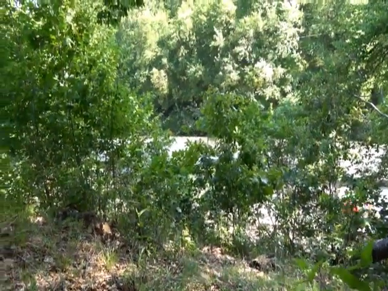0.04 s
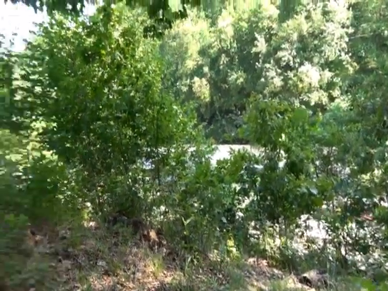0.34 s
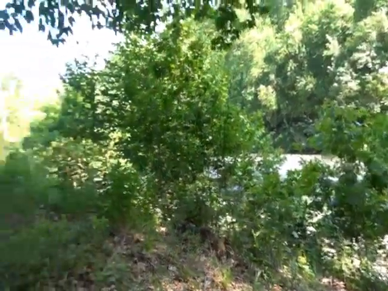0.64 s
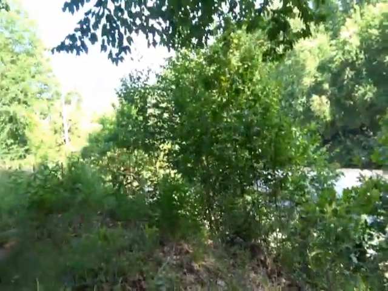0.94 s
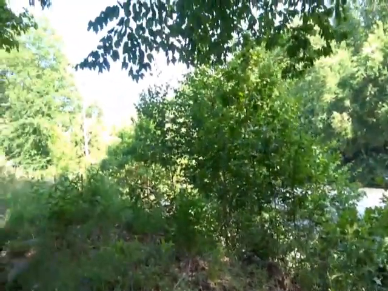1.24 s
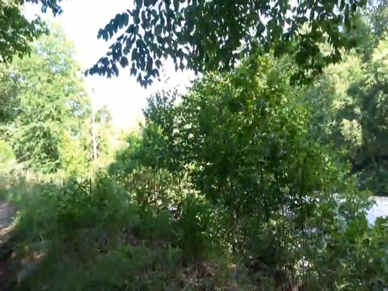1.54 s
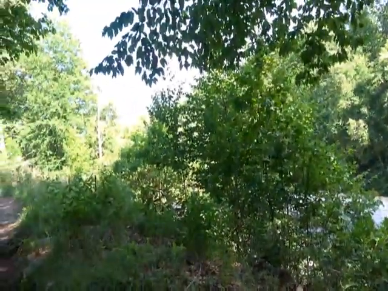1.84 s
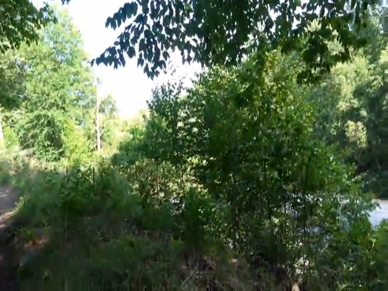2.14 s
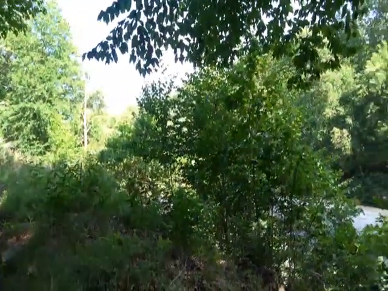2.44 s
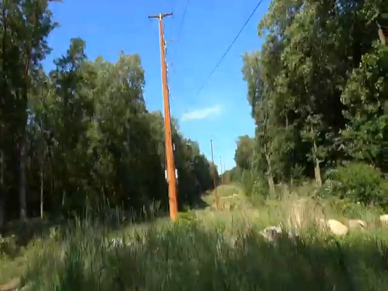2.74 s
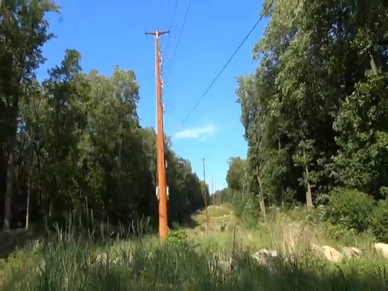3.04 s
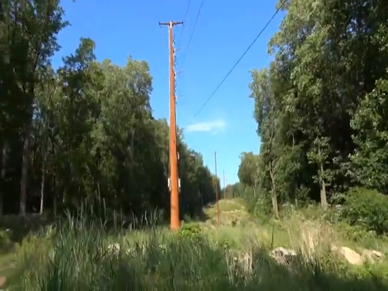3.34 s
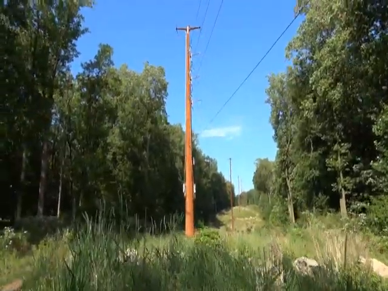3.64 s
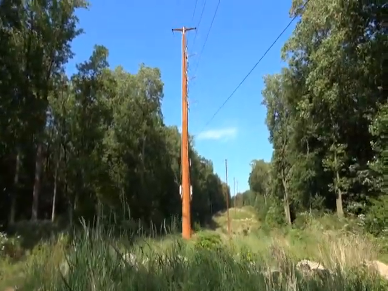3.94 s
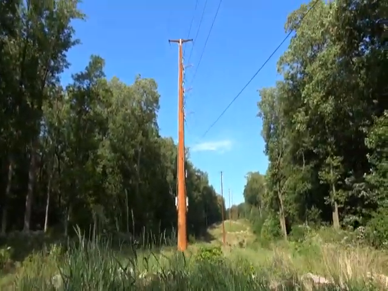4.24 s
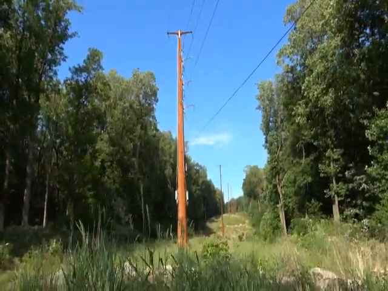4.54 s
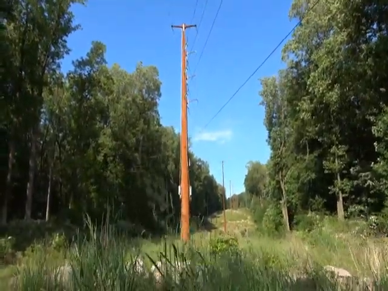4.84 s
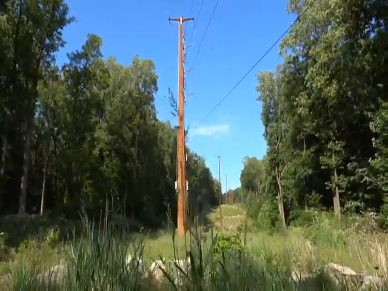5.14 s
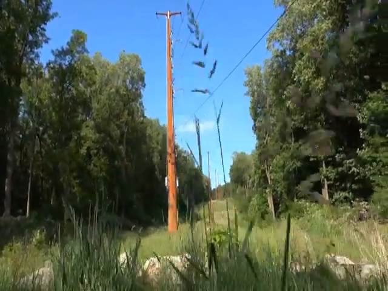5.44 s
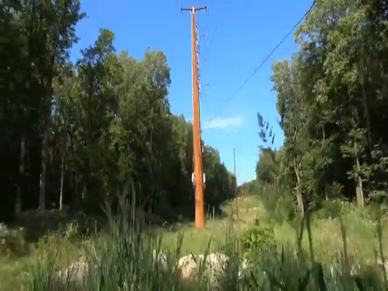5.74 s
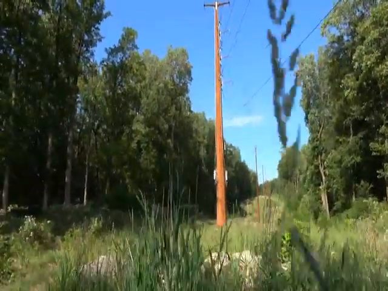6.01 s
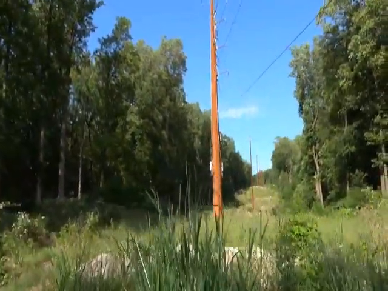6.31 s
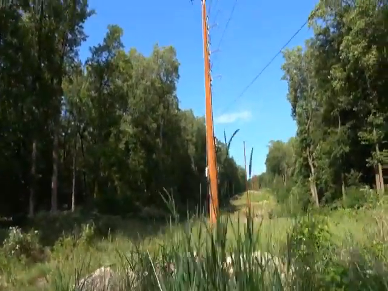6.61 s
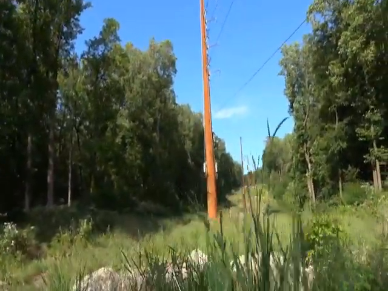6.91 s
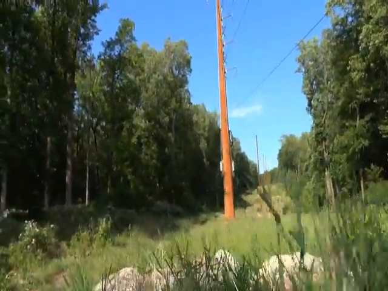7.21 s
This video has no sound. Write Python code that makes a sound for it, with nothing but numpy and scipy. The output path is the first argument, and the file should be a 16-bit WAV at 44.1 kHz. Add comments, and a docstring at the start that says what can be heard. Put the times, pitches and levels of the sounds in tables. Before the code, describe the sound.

From the start, a steady, broad roar of tyres from a busy road comes through the trees, wavering slightly in the moving air. A car's exhaust hum passes at about 0.5 seconds, dipping a little in pitch as it fades, while the hiss of river rapids gradually rises underneath. A dry twig gives one tiny, sharp tick at about 2.2 seconds. At about 2.5 seconds the sound stutters for an instant with a few clicks and jumps to a woodland clearing further from the road. The roar is now softer and duller, with a low rumble. One distant truck drones past around 4 seconds, and a second, deeper one swells slowly to its peak near 6.5 seconds. A faint hiss of leaves dies away with the breeze, and the far traffic continues until the end at about 7.5 seconds.

```python
"""Tyre roar from a busy road, heard through trees at two places in a wood; moving air makes it waver.
River bank: a car's exhaust note, rising hiss of rapids, a twig ticking underfoot.
The sound freezes briefly, clicks at the seams and jumps to a power-line clearing further from the road.
Clearing: two trucks drone under a softer roar; a dying breeze stirs the leaves."""
import sys
import numpy as np
from scipy import signal
from scipy.fft import rfft, irfft, next_fast_len
from scipy.io import wavfile
from scipy.ndimage import map_coordinates

SR = 44100
rng = np.random.default_rng(int(sys.argv[2]) if len(sys.argv) > 2 else 0)


def wav_out(sig):
    """Save sig, one row per channel (or a flat mono array), as 16-bit PCM at SR to the path in sys.argv[1]."""
    wavfile.write(sys.argv[1], SR, np.round(np.clip(np.atleast_2d(sig).T, -1, 1) * 32767).astype(np.int16))


N = 325017
TIME_S = np.arange(N) / SR

# Road spectra; soft ground absorbs 300-550 Hz: f/Hz, base density/(dB re 1/Hz), pan L-R/dB
BANK_ROAD_SPECTRUM = [(25,-62,3), (45,-56,3), (75,-47,2), (130,-49,-0.5), (250,-50,-6.5), (395,-57,-9),
                      (578,-55,-9), (836,-42.5,-5.5), (1094,-44,-6), (1441,-49.0,-7), (1907,-53,-5),
                      (3075,-66,-4.5), (5460,-78.5,-4.5), (11000,-98,-2.4)]
CLEARING_ROAD_SPECTRUM = [(25,-54,0), (60,-46.5,4.5), (100,-44.5,3.5), (144,-48,-1), (201,-53.5,-11.5),
                          (294,-60,-7), (542,-57.5,-3.5), (730,-53.5,-5.5), (1040,-53,-8), (1907,-62,-7.5),
                          (3110,-74,-6), (4290,-79.5,-4.5), (5980,-86,-3.5), (10500,-102.7,0.1)]
# Diffuse hiss spectra: f/Hz, base density/(dB re 1/Hz)
RAPIDS_SPECTRUM = [(30, -75), (180, -62.5), (450, -80), (900, -63), (2000, -77), (4300, -85), (6200, -84),
                   (11000, -99)]
LEAF_SPECTRUM = [(30, -77), (180, -66.5), (450, -74.5), (900, -70), (2000, -85), (4300, -90.5),
                 (6200, -87.5), (11000, -100)]
# Exhaust tones: nearest t/s, time to -3 dB/s, firing f/Hz, glide/(Hz/s), wander/Hz,
# level/dB, relative octave level/dB, pan L-R/dB
ENGINE_PASSES = [(.45, 0.7, 227, -7.5, 1.07, -35, -15, -6), (3.95, 1.2, 102.3, -1.5, 2.2, -30.5, -9.5, 2),
                 (6.5, 3, 63.23, .5, 1.186, -33.5, -8.5, 3)]
# Fibre breaks in a dry twig: t/s, level/dB, f/Hz, t60/s
TWIG_BREAKS = [(2.2142, -23, 7000, 0.0046), (2.2145, -31, 10500, .003), (2.2153, -21, 4600, .004),
               (2.2163, -31, 8600, .006)]

FREEZE_S, BLOCK_S = 2.4946, 1 / 30
MIC_CUTOFF_HZ, OUTPUT_CUTOFF_HZ = 10800, 14400


def road(spectrum, tyre_db, tread_db, rumble_db, waver_db):
    """Tyres and engines merge into one roar; moving air makes each band waver."""
    roar = np.zeros((2, N))
    for hz, band in noise_bands(spectrum):
        engine_share = 1 / (1 + (hz / 150) ** 4)
        tread_share = 1 / (1 + (1150 / hz) ** 6) / (1 + (hz / 2700) ** 4)
        gain_db = engine_share * rumble_db + (1 - engine_share) * tyre_db + tread_share * tread_db
        _, pan_db = spectrum_at(spectrum, hz)
        roar += band * undb(gain_db + waver_db * drift(rate_hz=5)) * pan(pan_db)
    return roar


def engine(nearest_s, passing_s, firing_hz, glide_hz_per_s, wander_hz, level_db, octave_db, pan_db):
    """Far exhaust passing by: only the firing tone and its octave carry, falling as 1/distance."""
    since_s = TIME_S - nearest_s
    relative_distance = np.hypot(1, since_s / passing_s)
    pitch_hz = firing_hz + glide_hz_per_s * since_s + wander_hz * drift(rate_hz=8)
    phase = 2 * np.pi * np.cumsum(pitch_hz) / SR
    tone = np.sin(phase) + undb(octave_db) * np.sin(2 * phase)
    air_fading_db = 2.6 * drift(rate_hz=6)
    return np.sqrt(2) * tone / relative_distance * undb(level_db + air_fading_db) * pan(pan_db)


def hiss(spectrum, gain_db, flicker_db):
    """Countless splashes or leaves all round: flickering bands, left and right uncorrelated."""
    channels = np.zeros((2, N))
    for channel in channels:
        for _, band in noise_bands(spectrum):
            channel += band * undb(flicker_db * drift(rate_hz=20))
    return channels * undb(gain_db)


def twig(pan_db):
    """Dry fibres break in turn, each ringing for a few ms."""
    tick = np.zeros(N)
    for start_s, level_db, ring_hz, t60_s in TWIG_BREAKS:
        age_s = np.maximum(TIME_S - start_s, 0)
        decay = undb(-60 * np.minimum(age_s / t60_s, 10))
        tick += undb(level_db) * np.sin(2 * np.pi * ring_hz * age_s) * decay
    return tick * pan(pan_db)


def river_bank():
    """Near road, one car, rapids, twig."""
    # A fast vehicle draws away: tread hiss fades, the duller roar builds.
    traffic = road(BANK_ROAD_SPECTRUM, tyre_db=ramp(-0.79, db_per_s=0.6),
                   tread_db=ramp(3, db_per_s=-2.5), rumble_db=0.2, waver_db=0.8)
    shift_db, shift_s = 1.1, 1.4  # the roar shifts rightward at the start
    traffic *= pan(shift_db * np.maximum(1 - TIME_S / shift_s, 0))
    car = sum(engine(*row) for row in ENGINE_PASSES if row[0] < FREEZE_S)
    rapids = hiss(RAPIDS_SPECTRUM, ramp(-3, db_per_s=2.4), flicker_db=2.5)
    return traffic + car + rapids + twig(pan_db=-2)


def clearing():
    """Far road, slowly brightening; two trucks; leaves in a dying breeze."""
    traffic = road(CLEARING_ROAD_SPECTRUM, tyre_db=0.05,
                   tread_db=ramp(-0.6, db_per_s=0.22, start_s=FREEZE_S),
                   rumble_db=ramp(-2.5, db_per_s=-0.1, start_s=FREEZE_S), waver_db=0.45)
    trucks = sum(engine(*row) for row in ENGINE_PASSES if row[0] > FREEZE_S)
    leaves = hiss(LEAF_SPECTRUM, ramp(3, db_per_s=-1.44, start_s=FREEZE_S), flicker_db=0.5)
    return traffic + trucks + leaves


def freeze_and_cut(before, after, click_step, repeats=2):
    """The last block repeats before the change of place; each seam is a waveform step that clicks."""
    block, reach = int(BLOCK_S * SR), SR // 500
    candidates = int(FREEZE_S * SR) + np.arange(-reach, reach)
    steps = abs(before[:, candidates - 1] - before[:, candidates - block]).mean(axis=0)
    seam = candidates[np.argmin(abs(steps - click_step))]
    stutter = np.tile(before[:, seam - block:seam], repeats)
    return np.hstack([before[:, :seam], stutter, after[:, seam + repeats * block:]])


def microphone(sound):
    """Rounds the highest peaks, loses the top treble."""
    rounded = sound / (1 + (sound / 0.92) ** 10) ** (1 / 10)
    return low_pass(rounded, MIC_CUTOFF_HZ)


def noise_bands(spectrum, count=18, lowest_hz=30):
    """Shaped noise in overlapping half-octave bands; yields (centre f/Hz, signal)."""
    size = next_fast_len(N, True)
    hz = np.maximum(np.fft.rfftfreq(size, 1 / SR), 1)
    density_db = spectrum_at(spectrum, hz)[0]
    bins = rfft(rng.standard_normal(size)) * np.sqrt(SR / 2) * undb(density_db)
    bins *= hz ** 2 / (hz ** 2 + 10 ** 2)  # 10 Hz high-pass
    band_position = np.clip(2 * np.log2(hz / lowest_hz), 0, count - 1)
    for k in range(count):
        weight = np.maximum(1 - abs(band_position - k), 0)
        yield lowest_hz * 2 ** (k / 2), irfft(bins * weight, size)[:N]


def spectrum_at(spectrum, hz):
    """The dB columns, interpolated over log frequency."""
    knots_hz, *columns = np.transpose(spectrum)
    return [np.interp(np.log(hz), np.log(knots_hz), column) for column in columns]


def drift(rate_hz):
    """Smooth random curve, spread near 1."""
    knots = rng.standard_normal(int(N / SR * rate_hz) + 4)
    grid_s = np.linspace(0, N / SR, 2048)
    curve = map_coordinates(knots, [grid_s * rate_hz + 1], order=3)
    return np.interp(TIME_S, grid_s, curve)


def ramp(start_db, db_per_s, start_s=0):
    """Level in dB: held until start_s, then a steady slope."""
    return start_db + db_per_s * np.maximum(TIME_S - start_s, 0)


def pan(left_minus_right_db):
    """Left and right gains."""
    return undb(np.array([[1], [-1]]) * left_minus_right_db / 2)


def undb(db):
    """dB to gain."""
    return 10 ** (np.asarray(db) / 20)


def low_pass(sound, cutoff_hz):
    """Steep zero-phase treble cut."""
    sections = signal.ellip(8, 0.05, 50, cutoff_hz, fs=SR, output="sos")
    return signal.sosfiltfilt(sections, sound)


def scene():
    """River bank, freeze, clearing."""
    return freeze_and_cut(microphone(river_bank()), microphone(clearing()), click_step=0.42)


def record(dry):
    """Band-limits the seam clicks."""
    return low_pass(dry, OUTPUT_CUTOFF_HZ)


dry = scene()
out = record(dry)
wav_out(out)
```